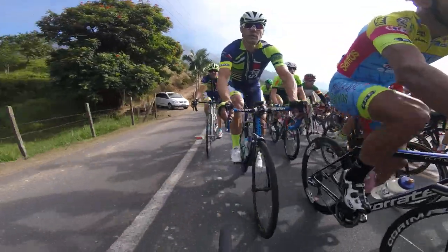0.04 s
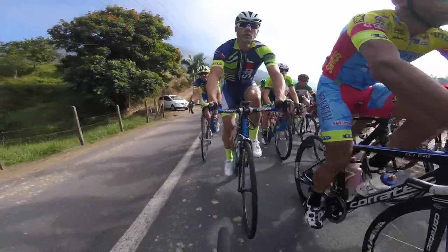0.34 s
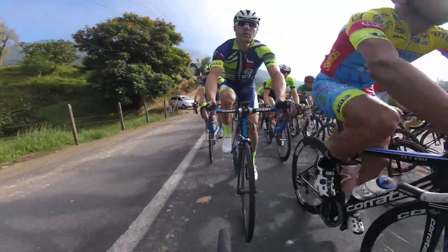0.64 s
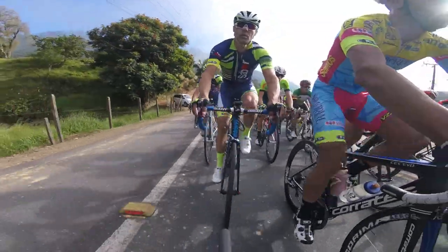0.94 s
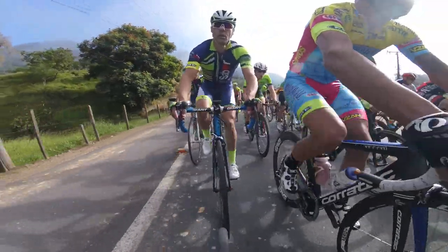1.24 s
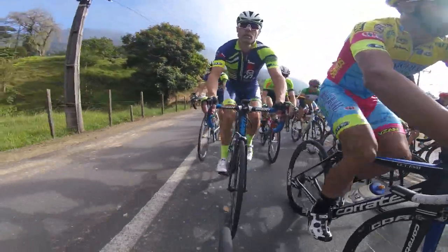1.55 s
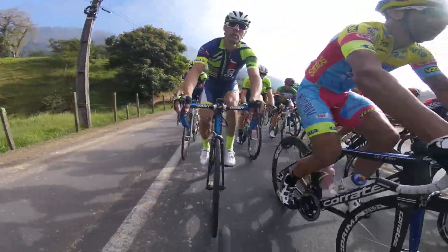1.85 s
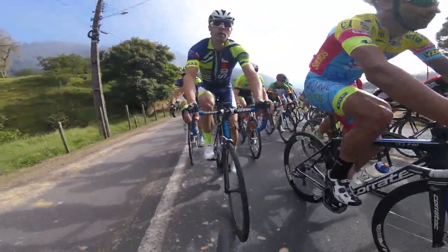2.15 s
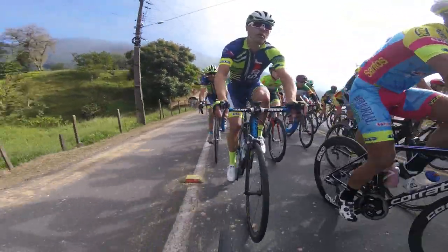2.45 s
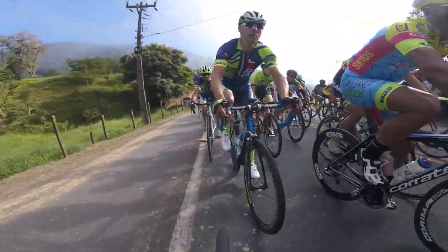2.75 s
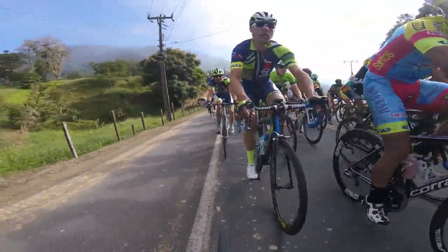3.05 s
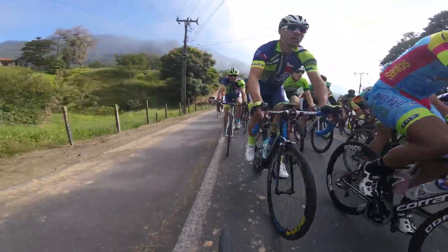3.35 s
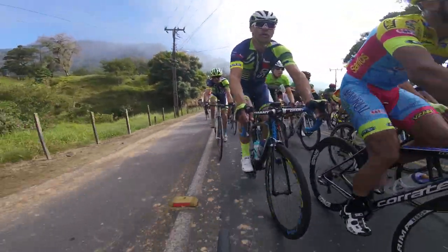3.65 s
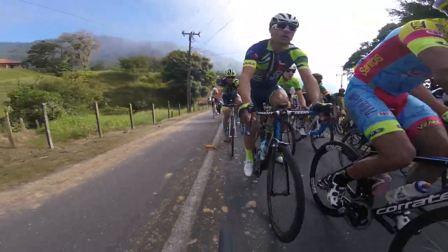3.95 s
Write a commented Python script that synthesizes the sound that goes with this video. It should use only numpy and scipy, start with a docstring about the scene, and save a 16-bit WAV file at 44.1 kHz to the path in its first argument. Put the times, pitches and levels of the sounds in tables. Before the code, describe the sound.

Wind buffets a bicycle-mounted microphone throughout, with gusts and dull puffs thickest midway. Underneath, the bicycle drones on the rough road and a following bunch gives faint tyre hiss and chain ticks. Small knocks come once early, then near the end.

```python
"""A country road, from a camera microphone on a racing bicycle at the head of a bunch. From the start wind
rumbles right on the microphone and rough asphalt makes the frame and camera mount hum and drone, while tyres
hiss and chains fizz and tick behind. From half a second in, the wind flutters harder in surges that follow the
pedal strokes, about two a second; its sharp puffs come thickest just after two seconds. A bump in the road
knocks the camera before the first second is out, and three more follow near the end."""
import sys
import numpy as np
from scipy.fft import rfft, irfft, next_fast_len
from scipy.io import wavfile
from scipy.ndimage import map_coordinates

SR = 44100
rng = np.random.default_rng(int(sys.argv[2]) if len(sys.argv) > 2 else 0)


def store_pcm(level_fs):
    """Save levels as 16-bit WAV."""
    pcm = np.round(np.clip(level_fs, -1, 1) * 32767).astype(np.int16)
    wavfile.write(sys.argv[1], SR, np.atleast_2d(pcm).T)


N = 176400
T = np.arange(N) / SR


def amp(db):
    """Decibels to gain."""
    return 10 ** (np.asarray(db) / 20)


def unit(x):
    """Scale to rms 1."""
    return x / np.sqrt(np.mean(x ** 2) + 1e-20)


def curve(rows):
    """(time [s], value) points joined by straight lines."""
    return np.interp(T, *np.transpose(rows))


def wobble(per_s):
    """A smooth random curve through per_s points a second."""
    return map_coordinates(rng.standard_normal(4096), [T * per_s], mode="wrap")


def filtered(x, response):
    """Filter x by a gain given as a function of frequency."""
    size = next_fast_len(N + SR // 2)
    return irfft(rfft(x, size) * response(np.fft.rfftfreq(size, 1 / SR)), size)[:N]


def coloured(x, spectrum):
    """Shape x by (frequency [Hz], level [dB]) points, at rms 1."""
    points_hz, db = np.transpose(spectrum)
    return unit(filtered(x, lambda hz: amp(np.interp(np.log(hz + 1), np.log(points_hz), db, right=-120))))


def steady(x, span_s):
    """Even out the chance swells of a noise that last longer than span_s, at rms 1."""
    blur = lambda hz: np.exp(-(hz * span_s) ** 2)
    power = filtered(x ** 2, blur) / filtered(np.ones(N), blur)
    return unit(x / np.sqrt(np.abs(power) + 0.022))


def strikes(events, modes, attack_s):
    """Every event rings the decaying modes, each time a little differently."""
    out, t = np.zeros(N + SR), np.arange(SR // 10) / SR
    hz, mode_db, t60 = np.transpose(modes)[:, :, None]
    for time, db in events:
        scatter, detune, phase = rng.standard_normal((3, len(modes), 1))
        decay = amp(mode_db + 2 * scatter - 60 * t / t60)
        ring = decay * np.sin(2 * np.pi * (hz * (1 + 0.0082 * detune) * t + phase))
        out[round(time * SR):][:len(t)] += amp(db) * ring.sum(0) * (1 - np.exp(-t / attack_s))
    return out[:N]


# Wind right on the microphone (time [s], relative level [dB])
WIND_LEVEL = [(.02, -15.5), (.09, -22), (.2, -16), (.55, -16.5), (.93, -19.5), (1.22, -15.5), (1.55, -16),
              (1.63, -20), (1.73, -17.5), (1.85, -18), (2.07, -15), (2.16, -13), (2.26, -18), (2.55, -16.5),
              (2.77, -18), (2.89, -14), (2.98, -18), (3.2, -14.5), (3.3, -17.5), (3.4, -16), (3.5, -19.5),
              (3.62, -18), (3.68, -13), (3.75, -18), (3.84, -15.5), (3.97, -18)]
# Brief lulls in it (time [s], level change [dB])
WIND_LULLS = [(.945, -4), (1.345, -6), (1.48, -5), (1.60, -3), (1.885, -4), (2.122, -11), (2.285, -3),
              (2.385, -5), (2.68, -3), (3.80, -3)]
# Spectrum of the rumble (frequency [Hz], relative level [dB])
RUMBLE_SPECTRUM = [(12, -30.5), (25, -9.5), (42, 2), (62, -2), (80, -6.5), (105, -0.5), (135, -5.5),
                   (200, -13), (300, -15.5), (450, -34.5), (900, -54.5), (2000, -85)]

def wind_rumble(gain_db=0.5, lull_s=.026):
    """Large eddies press on the microphone, with brief lulls between them."""
    lull_db = sum(db * np.exp(-((T - time) / lull_s) ** 2) for time, db in WIND_LULLS)
    rumble = steady(coloured(rng.standard_normal(N), RUMBLE_SPECTRUM), span_s=0.062)
    return amp(gain_db + curve(WIND_LEVEL) + lull_db) * rumble


# Surges of the flutter at the microphone, in time with the pedal strokes, about two a second (time [s], length
# [s], level [dB])
WIND_SURGES = [(0.55, 0.16, -36.5), (0.885, 0.11, -38), (1.33, 0.2, -38), (1.68, 0.1, -40),
               (2.11, .25, -36), (2.49, .12, -41), (2.84, 0.13, -41), (3.595, 0.12, -37)]
# Spectrum of the flutter (frequency [Hz], relative level [dB])
FLUTTER_SPECTRUM = [(100, -23), (300, -4.5), (390, 9.5), (480, -1.5), (650, 4), (800, -5), (930, -13.5),
                    (1200, -14), (2200, -23.5), (4000, -36), (9000, -47)]

def wind_flutter(floor_db=-41, flutter_db=4):
    """Small eddies tear off at the microphone in a quick flutter that swells in surges."""
    surge_power = sum(amp(db) ** 2 * np.exp(-(2 * (T - time) / length) ** 4)
                      for time, length, db in WIND_SURGES)
    eddies = rng.standard_normal(N) * amp(flutter_db * np.clip(wobble(per_s=240), -2, 2))
    flutter = steady(coloured(eddies, FLUTTER_SPECTRUM), span_s=.05)
    return np.sqrt(amp(floor_db) ** 2 + surge_power) * flutter


# Road shake in the mount, right at the camera (time [s], relative level [dB])
ROAD_SHAKE = [(.02, -22), (.15, -32), (.24, -19.5), (.29, -24), (.33, -21.5), (.4, -24), (.46, -33),
              (.6, -23.5), (.68, -27), (.76, -19.5), (.89, -31), (.94, -23), (1.06, -32), (1.12, -22),
              (1.2, -32), (1.36, -29), (1.43, -19.5), (1.6, -28), (1.66, -20), (1.75, -27), (1.8, -21),
              (1.95, -28), (2.1, -23), (2.23, -31), (2.33, -19.5), (2.44, -26), (2.54, -19), (2.61, -25),
              (2.66, -20), (2.81, -27), (2.92, -22), (3.0, -21.5), (3.16, -32), (3.47, -20), (3.56, -33),
              (3.74, -21.5), (3.81, -29), (3.93, -23.5)]

def mount_hum(hum_hz=250.9, half_width_hz=15.4, gain_db=-0.5):
    """The grain of the asphalt keeps the main resonance of the camera mount ringing."""
    ring = filtered(rng.standard_normal(N), lambda hz: 1 / (1 + ((hz - hum_hz) / half_width_hz) ** 2))
    return amp(gain_db + curve(ROAD_SHAKE)) * steady(unit(ring), span_s=.09)


# Resonances of frame and mount under the camera (frequency [Hz], width [Hz], relative level [dB])
FRAME_MODES = [(289.5, 43, 18.5), (305, 96, -3), (350, 15, -13), (660, 230, -20), (800, 41, -3)]

def frame_drone(level_db=-31.5, cutoff_hz=1100):
    """The road shakes the higher, weaker resonances of frame and mount into an even drone."""
    def response(hz):
        modes = sum((-1) ** k * amp(db) * 1j * hz * width / (centre ** 2 - hz ** 2 + 1j * hz * width)
                    for k, (centre, width, db) in enumerate(FRAME_MODES))
        return modes / (1 + (hz / cutoff_hz) ** 6)
    drone = filtered(rng.standard_normal(N), response)
    return amp(level_db) * steady(unit(drone), span_s=0.21)


# Tyres of the bunch, behind the microphone (time [s], level [dB])
TYRE_LEVEL = [(0, -47), (1, -47.5), (1.9, -46), (2.15, -47), (2.35, -48), (3.2, -48.5), (4, -48)]
# Spectrum of tread on asphalt (frequency [Hz], relative level [dB])
TREAD_SPECTRUM = [(300, -12.5), (850, 12), (1050, -12.5), (1300, -15), (1600, -1), (1880, 2), (2100, -2.5),
                  (2450, -1), (3100, -6), (4000, -14), (6000, -12), (12000, -44.5)]

def tyre_hiss(rough_db=1.8):
    """Rolling treads hiss, roughened by the stones in the road."""
    stones_db = rough_db * wobble(per_s=170)
    return amp(curve(TYRE_LEVEL) + stones_db) * coloured(rng.standard_normal(N), TREAD_SPECTRUM)


# Chains and sprockets, behind the microphone (time [s], relative level [dB])
CHAIN_LEVEL = [(0, -59.5), (.11, -59.5), (.15, -57.5), (.25, -59), (.32, -55.5), (.39, -59.5), (.5, -57),
               (.72, -59), (1.7, -58.5), (1.9, -57), (2.06, -56), (2.14, -60), (2.52, -60.5), (3.15, -60.5),
               (3.6, -59), (3.68, -61), (3.78, -58), (3.86, -62.5), (3.97, -59)]
# Spectrum of their fizz (frequency [Hz], relative level [dB])
FIZZ_SPECTRUM = [(2500, -19), (4100, -9), (4900, -0.5), (5300, -2), (5750, 0.5), (6150, -6.5), (6500, -0.5),
                 (6900, -6.5), (7700, -10), (9000, -13), (10300, -21.5), (11500, -28), (13000, -52.5)]

def chain_fizz(gain_db=2, grain_db=3, waver_db=.8):
    """Countless links meet their sprockets in a grainy fizz."""
    links = rng.standard_normal(N) * amp(grain_db * wobble(per_s=800))
    level_db = gain_db + curve(CHAIN_LEVEL) + waver_db * wobble(per_s=35)
    return amp(level_db) * coloured(links, FIZZ_SPECTRUM)


# The sharpest puffs, right on the microphone (time [s], peak level [dB], bright up to [Hz])
WIND_PUFFS = [(.042, -27.5, 800), (.126, -26, 700), (.186, -26, 1000), (.418, -25, 1100), (.487, -26, 600),
              (.512, -25, 650), (.542, -26, 700), (.560, -17.5, 650), (.588, -25, 750), (.620, -26, 700),
              (.848, -23, 750), (.900, -27, 700), (1.206, -26, 600), (1.229, -26, 650), (1.293, -24, 1100),
              (1.320, -25, 1000), (1.396, -23.5, 550), (1.610, -25, 700), (1.658, -25, 750),
              (1.984, -19, 750), (2.025, -22, 1200), (2.036, -20, 1200), (2.070, -19.5, 750),
              (2.091, -24, 650), (2.113, -19.5, 1800), (2.124, -23, 600), (2.156, -20.5, 1100),
              (2.179, -24, 750), (2.196, -18.5, 900), (2.202, -24, 1600), (2.212, -23, 750),
              (2.483, -25, 550), (2.558, -25.5, 650), (2.776, -27, 600), (2.812, -23.5, 700),
              (2.835, -23.5, 750), (2.854, -23.5, 900), (3.576, -25, 600), (3.599, -21, 750),
              (3.619, -21, 700), (3.640, -25, 700), (3.675, -24, 700)]

def wind_puffs(low_cut_hz=430, tilt_db_per_octave=-5, fall_db_per_octave=21, trail_db=-6):
    """Single eddies burst on the microphone port: dull pops, each trailed by a weaker one."""
    size = 2048
    out, hz = np.zeros(N + size), np.fft.rfftfreq(size, 1 / SR) + 1
    body = amp(tilt_db_per_octave * np.log2(hz)) / (1 + (low_cut_hz / hz) ** 6)
    for time, db, bright_hz in WIND_PUFFS:
        colour = body / np.hypot(1, amp(fall_db_per_octave * np.log2(hz / bright_hz)))
        trail_s = .0035 * (.5 + rng.random())
        for start, level in [(time, db), (time + trail_s, db + trail_db)]:
            pop = irfft(colour * np.exp(2j * np.pi * rng.random())) / irfft(colour).max()
            out[round(start * SR):][:size] += amp(level) * np.fft.fftshift(pop)
    return out[size // 2:][:N]  # centres each pop on its time


# Single chain ticks, behind the microphone (time [s], relative level [dB])
CHAIN_TICKS = [(.134, -44), (.467, -44), (.989, -44), (1.092, -43), (1.122, -43), (1.769, -40),
               (1.826, -35), (1.848, -37), (2.862, -44), (3.945, -44)]
# Modes of the steel (frequency [Hz], relative level [dB], time to fall 60 dB [s])
STEEL_MODES = [(4900, 2.5, 0.016), (5200, -5, 0.016), (6000, -5.5, 0.025), (6450, -3.5, 0.025),
               (7360, -12, 0.021), (9100, -19, .012)]

def chain_ticks(gain_db=-3.5):
    """Now and then a chain ticks, its steel ringing high and briefly."""
    return amp(gain_db) * strikes(CHAIN_TICKS, STEEL_MODES, attack_s=.0006)


# Bumps in the road under the bicycle (time [s], relative level [dB])
ROAD_BUMPS = [(.845, -35), (3.156, -35), (3.436, -35), (3.516, -29.5)]
# Modes of the case around the microphone (frequency [Hz], relative level [dB], time to fall 60 dB [s])
CASE_MODES = [(560, -6, 0.054), (837, 16.5, 0.039), (1082, -17.5, 0.06), (1370, -14, 0.051),
              (1788, 6.5, 0.032), (2270, -13, 0.013)]

def bump_knocks(gain_db=-11.5):
    """A bump jolts frame and mount, and the camera case rings with a short knock."""
    return amp(gain_db) * strikes(ROAD_BUMPS, CASE_MODES, attack_s=.0007)


def scene():
    """Wind, road and the bunch behind, in mono at the microphone on the leading bicycle."""
    impacts = bump_knocks() + chain_ticks()
    wind = wind_rumble() + wind_flutter() + wind_puffs()
    vibration = mount_hum() + frame_drone()
    bunch = tyre_hiss() + chain_fizz()
    return (impacts + wind + vibration + bunch)[None]


def record(dry):
    """The camera cuts off steeply above its band limit."""
    top_hz = 13500
    return filtered(dry[0], lambda hz: 1 / (1 + (hz / top_hz) ** 60))[None]


dry = scene()
out = record(dry)
store_pcm(out)
```